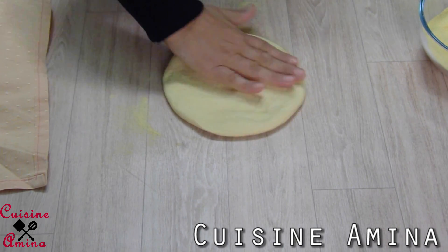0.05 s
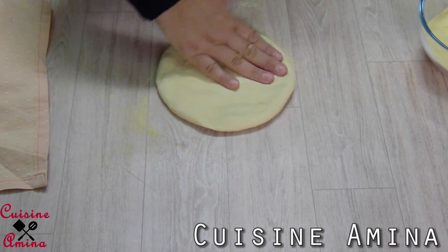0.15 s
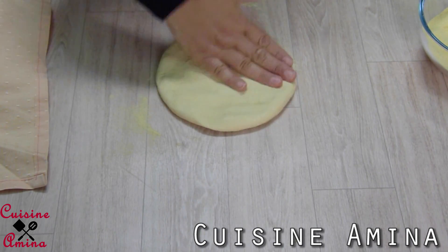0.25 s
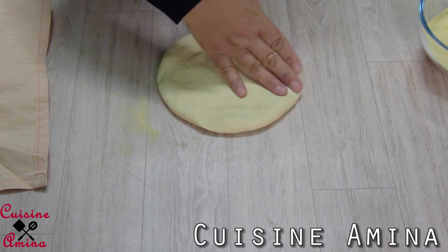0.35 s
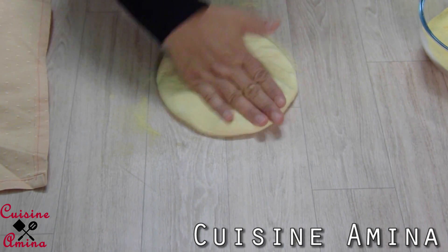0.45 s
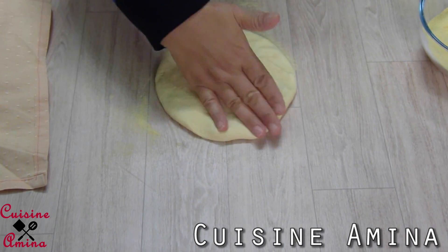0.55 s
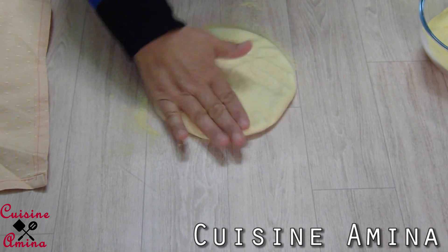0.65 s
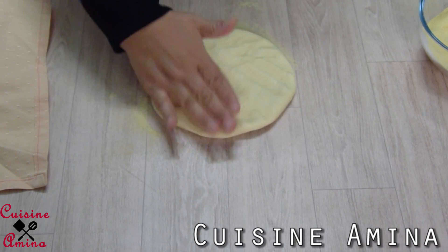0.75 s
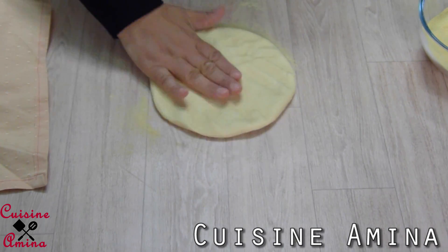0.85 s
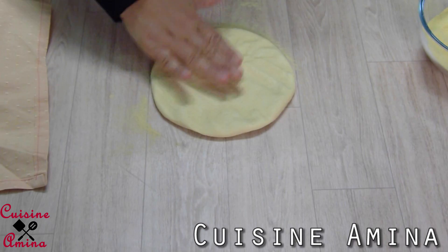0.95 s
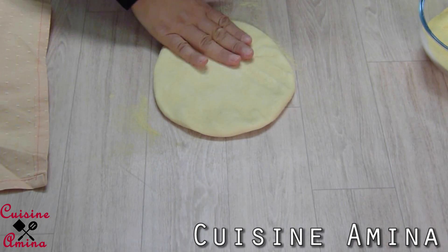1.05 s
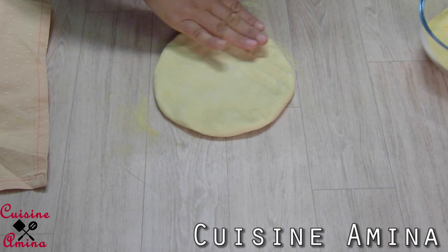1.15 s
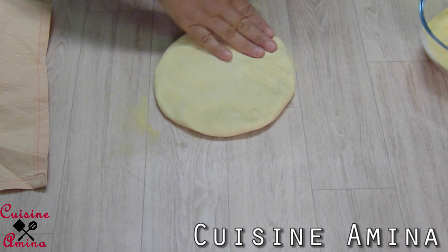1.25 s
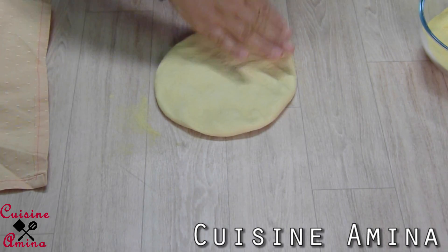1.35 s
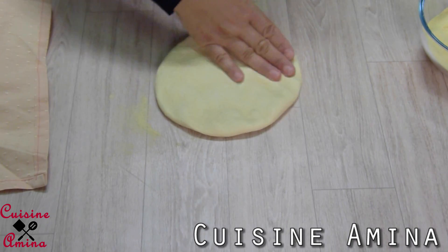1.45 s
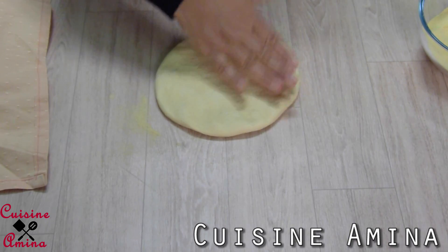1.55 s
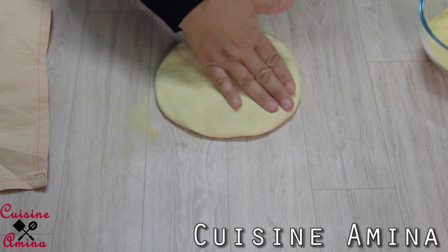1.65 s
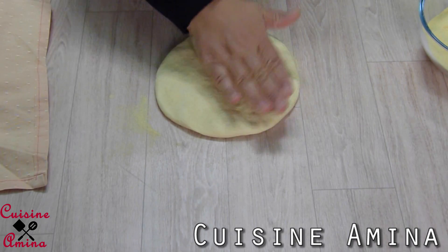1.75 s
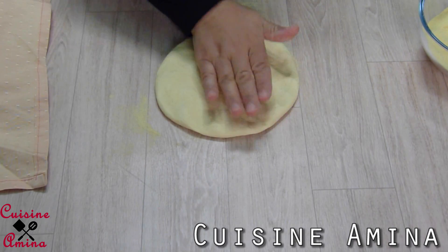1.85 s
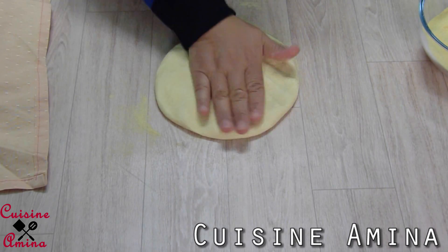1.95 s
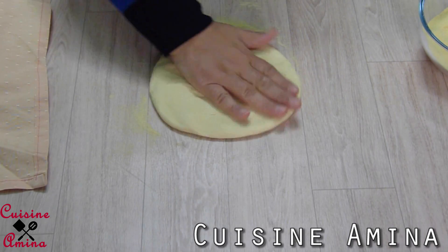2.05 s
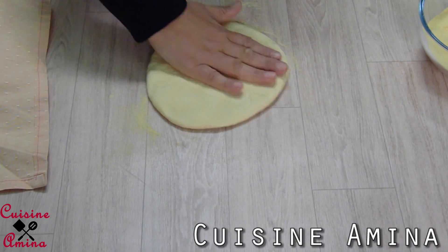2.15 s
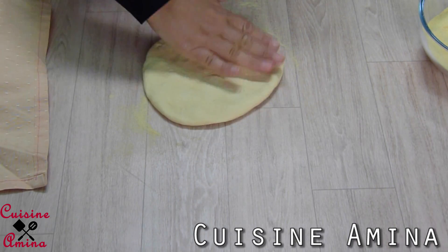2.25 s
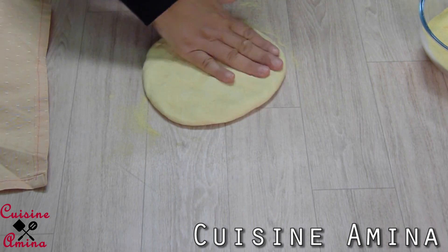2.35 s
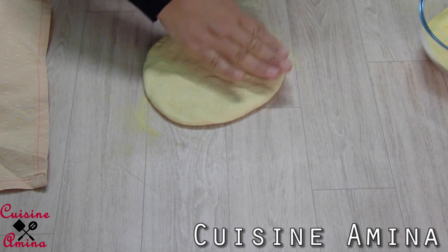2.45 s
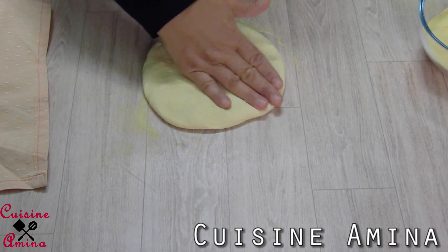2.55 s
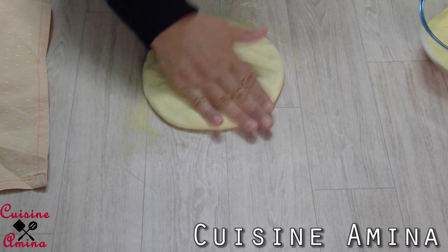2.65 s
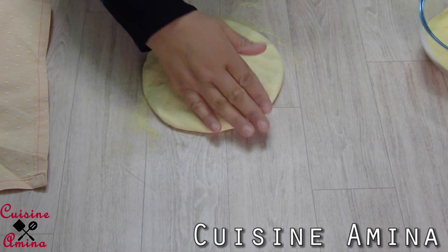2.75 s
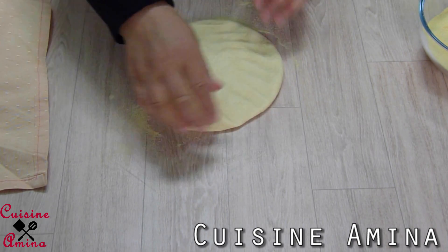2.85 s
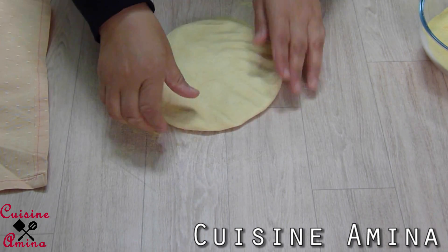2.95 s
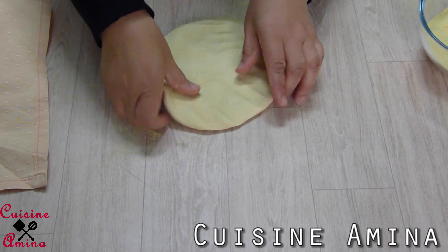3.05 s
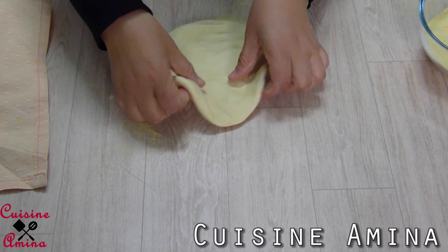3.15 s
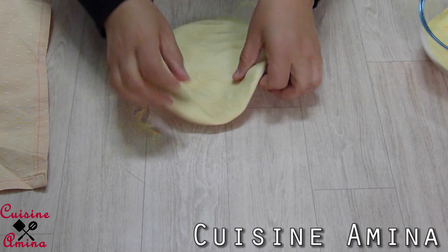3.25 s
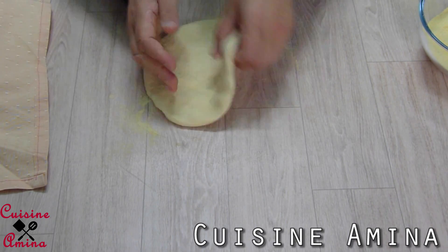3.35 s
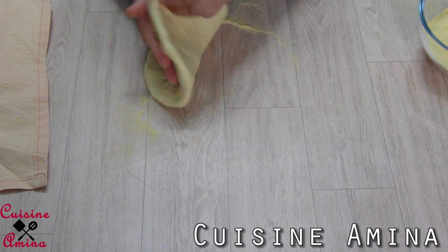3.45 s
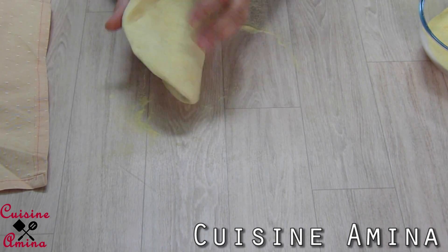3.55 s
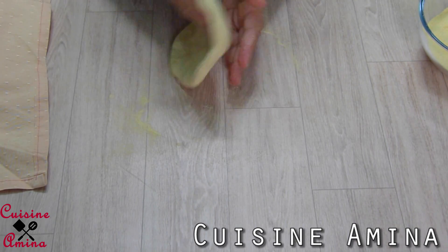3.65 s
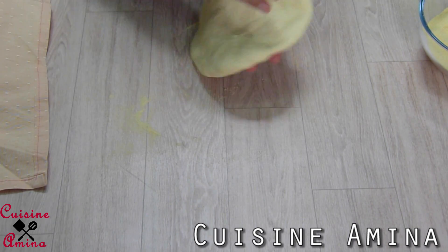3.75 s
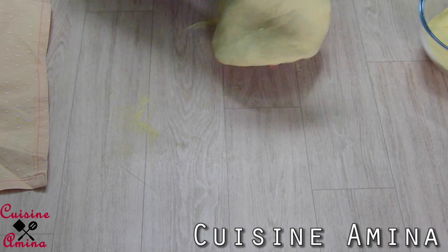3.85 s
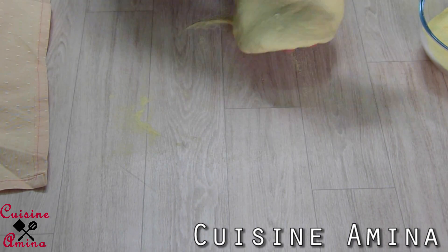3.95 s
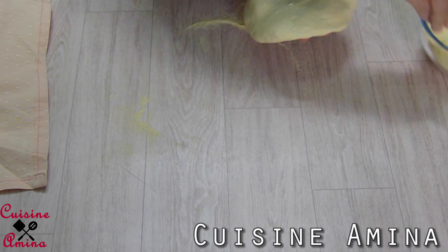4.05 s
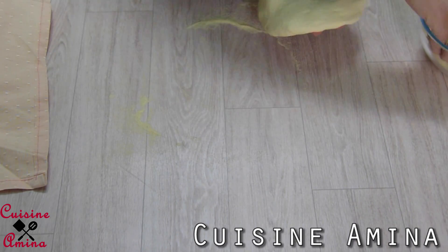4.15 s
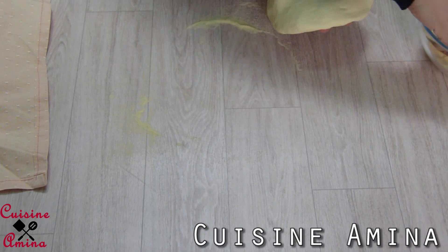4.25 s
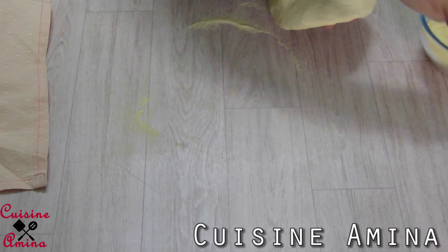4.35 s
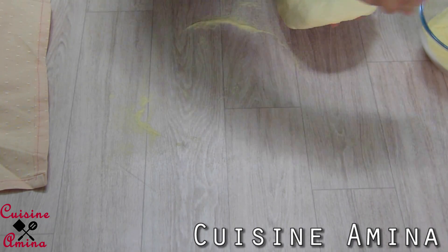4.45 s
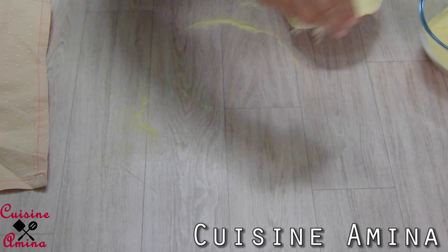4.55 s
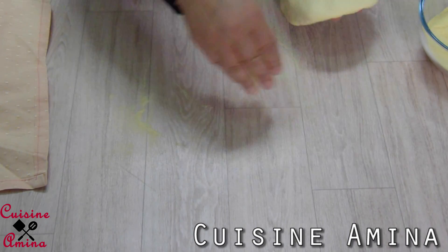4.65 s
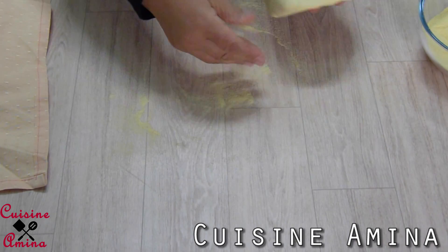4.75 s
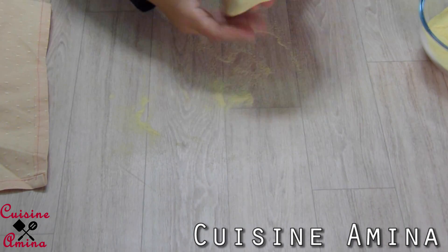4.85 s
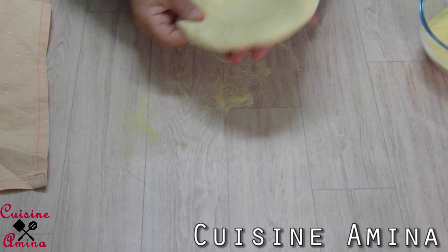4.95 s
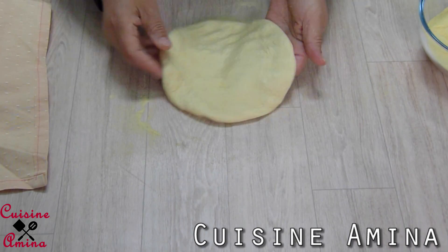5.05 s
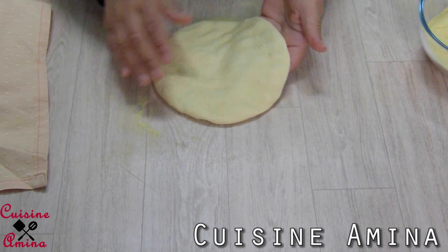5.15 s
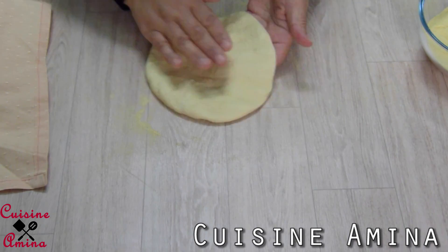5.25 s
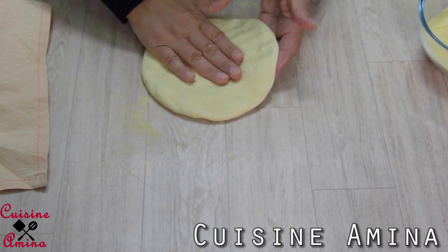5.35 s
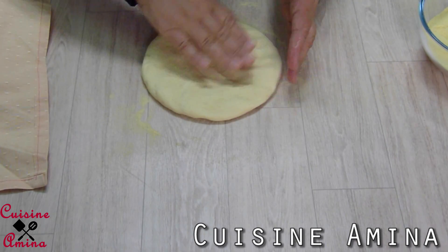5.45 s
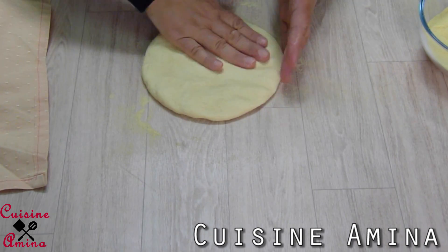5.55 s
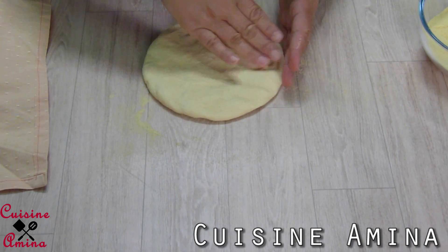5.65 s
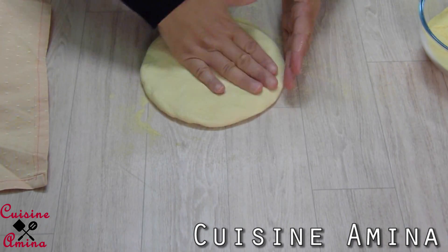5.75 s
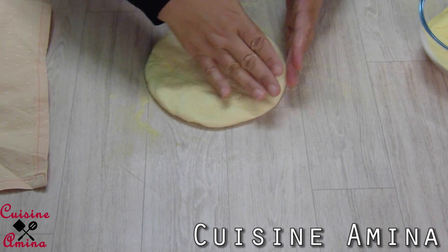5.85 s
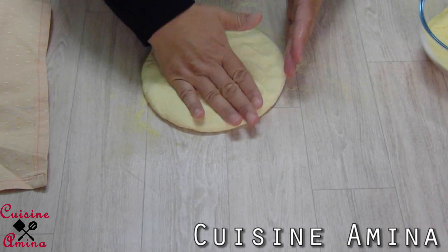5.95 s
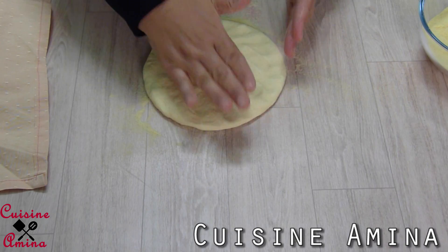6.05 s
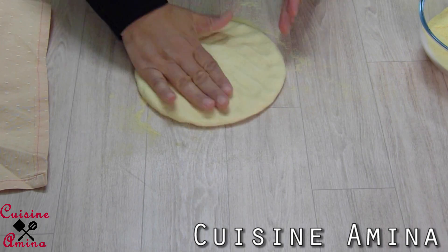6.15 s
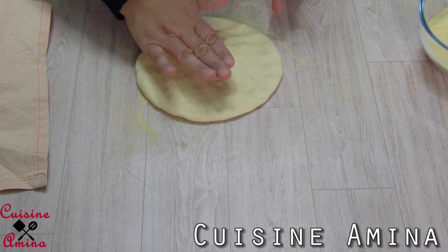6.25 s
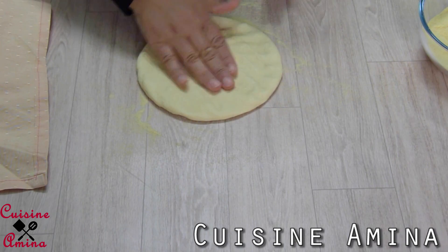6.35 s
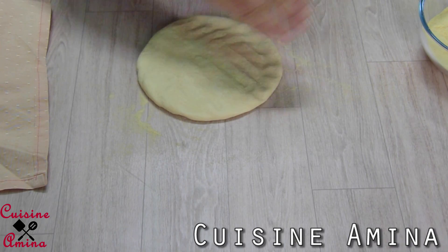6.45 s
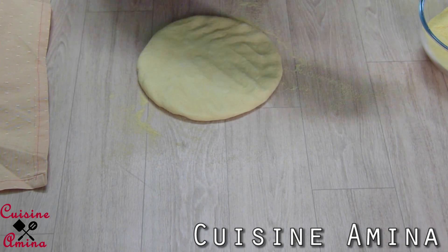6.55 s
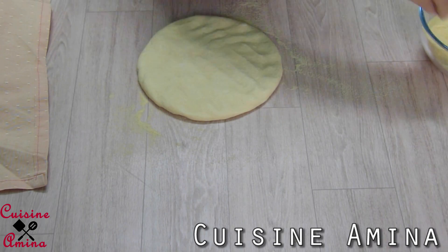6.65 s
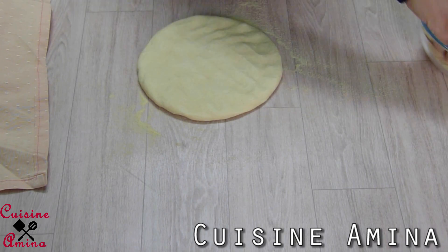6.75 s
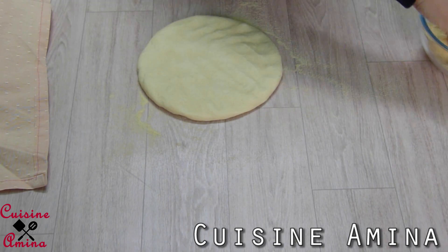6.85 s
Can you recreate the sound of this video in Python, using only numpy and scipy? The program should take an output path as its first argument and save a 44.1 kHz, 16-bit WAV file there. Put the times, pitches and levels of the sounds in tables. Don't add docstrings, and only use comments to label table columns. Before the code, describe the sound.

Irregular soft presses and firm, low slaps flatten dough on a hard board in a small room, with dry rubbing and sticky peeling ticks.

```python
import sys
import numpy as np
from scipy import signal
from scipy.fft import rfft, irfft, next_fast_len
from scipy.io import wavfile
from scipy.ndimage import uniform_filter1d

SR = 44100
rng = np.random.default_rng(int(sys.argv[2]) if len(sys.argv) > 2 else 0)


def log_audio(samples):
    frames = np.atleast_2d(samples).T
    limited = np.clip(frames, -1, 1)
    pcm = np.round(limited * 32767).astype(np.int16)
    wavfile.write(sys.argv[1], SR, pcm)


def rack_gain(trim_db):
    fader = np.asarray(trim_db, float)
    return 10 ** (fader / 20)


N = 304731

# pitch_hz, likeness
NEAR_LIKENESS = [(60, 1.0), (170, 1.0), (470, 0.99), (1320, 0.82), (3710, 0.23), (10400, 0.93)]


def unit(x):
    return x / np.sqrt(np.mean(x ** 2) + 1e-20)


def along(points, hz):
    f, v = np.transpose(points)
    return np.interp(np.log(hz + 1), np.log(f + 1), v)


def filtered(x, response):
    m = next_fast_len(x.shape[-1] + 4096)
    spectrum = rfft(x, m) * response(np.fft.rfftfreq(m, 1 / SR))
    return irfft(spectrum, m)[..., :x.shape[-1]]


def resonance(hz, width):
    return lambda f: 1 / (1 + ((f - hz) / width) ** 2)


def paired(pair, spectrum, alike):
    def mid_and_side(hz):
        turn = np.arccos(np.clip(along(alike, hz), -1, 1)) / 2
        return rack_gain(along(spectrum, hz)) * [np.cos(turn), np.sin(turn)]

    mid, side = filtered(pair, mid_and_side)
    return np.array([mid + side, mid - side])


def rush(spectrum, alike, patchy_db):
    z = signal.stft(rng.standard_normal((2, N)), nperseg=512)[2]
    field = uniform_filter1d(rng.standard_normal(z.shape[1:]), 5, 0)
    field = uniform_filter1d(field, 8, 1)
    pair = signal.istft(z * rack_gain(patchy_db * unit(field)), nperseg=512)[1][:, :N]
    return unit(paired(pair, spectrum, alike))


def air():
    # pitch_hz, level_db (per Hz)
    room_tone = [(18, -72), (30, 0), (118, -6), (182, -10), (333, -1), (612, -5), (685, -6), (749, -8),
                 (1180, -9), (1650, -13.5), (5070, -24), (6500, -29), (8450, -63), (14300, -120)]
    # pitch_hz, likeness
    diffuse_likeness = [(60, 1), (170, 0.98), (470, 0.95), (1320, 0.44), (3710, 0.052), (10400, 0.91)]
    # pitch_hz, width_hz, level_db
    motor = [(1174, 3.1, -71)]
    whine = 0
    for hz, width, db in motor:
        whine = whine + rack_gain(db) * unit(filtered(rng.standard_normal(N), resonance(hz, width)))
    return rack_gain(-46.5 - 6.5) * rush(room_tone, diffuse_likeness, patchy_db=1.5) + whine


def bowl():
    # pitch_hz, level_db, t60_s
    glass_modes = [(4156, -57.5, 0.52), (6420, -67, 0.67)]
    tick_s = 4.127
    out, t = np.zeros(N + SR), np.arange(SR // 2) / SR
    beat = 1 + 0.57 * np.cos(2 * np.pi * 8 * (t - .02))
    ring = sum(rack_gain(db - 60 * t / t60) * np.sin(2 * np.pi * hz * t) * beat for hz, db, t60 in glass_modes)
    out[round(tick_s * SR):][:len(t)] = ring * (1 - np.exp(-t / 0.0027))
    return out[:N] * rack_gain([[-1.5], [1.5]])


def slides():
    # pitch_hz, level_db (per Hz)
    semolina = [(500, -1.5), (1200, 3.5), (1800, -1), (3500, 2), (5500, 2.5), (7000, -1), (8000, -5)]
    # pitch_hz, level_db (per Hz)
    creep = [(35, -5), (55, -15), (90, -26), (135, 5.5), (230, 2.5), (400, -1), (700, -27)]
    # start_s, swell_s, fade_s, level_db
    strokes = [(-.05, 0.066, 0.4, -41), (.28, 0.11, 0.27, -57), (0.518, 0.0067, .15, -47),
               (1.95, 0.2, 0.27, -45.5), (2.05, 0.04, 0.33, -44), (2.602, 0.21, 0.092, -49.5),
               (3.05, 0.043, 0.84, -48.5), (3.33, 0.0087, 0.55, -59), (3.46, 0.15, 0.3, -48),
               (3.722, 0.079, 0.16, -50.5), (4.3, 0.16, 0.37, -68), (4.6, 0.045, 0.16, -62),
               (4.72, 0.043, 0.12, -58.5), (5.082, 0.024, 0.22, -39.5), (5.22, 0.11, 0.17, -44.5),
               (5.328, 0.13, 0.4, -43), (5.751, 0.038, 0.34, -49.5), (5.96, 0.036, 0.16, -47.5),
               (6.83, 0.027, 0.17, -58)]
    # time_s, creep_db
    lean = [(0.0, -43), (0.56, -46), (0.96, -45.5), (1.1, -36), (1.29, -42), (2.04, -49.5), (2.4, -52),
            (2.54, -45), (3.05, -54), (3.23, -40), (3.37, -50), (4.0, -54), (4.98, -50.5), (5.16, -45),
            (5.98, -48.5), (6.37, -47), (6.54, -60), (6.91, -53)]
    now = np.arange(N) / SR
    power = 0
    for start, swell, fade, db in strokes:
        stroke = np.interp(now, [start, start + swell, start + swell + fade], [0, 1, 0])
        power = power + rack_gain(2 * db) * stroke ** 3
    rub = np.sqrt(power) * rush(semolina, NEAR_LIKENESS, patchy_db=1.0)
    weight_db = np.interp(now, *np.transpose(lean)) - 1.5
    return rub + rack_gain(weight_db) * rush(creep, NEAR_LIKENESS, patchy_db=3.5)


def narrow_noises(events, width_hz, swell_s):
    out, t = np.zeros((2, N + SR)), np.arange(SR // 2) / SR
    for s, hz, db, t60 in events:
        airy = paired(rng.standard_normal((2, len(t))), [(100, 0)], NEAR_LIKENESS)
        tone = unit(filtered(airy, resonance(hz, width_hz(hz))))
        envelope = rack_gain(db - 60 * t / t60) * (1 - np.exp(-t / swell_s)) ** 2
        out[:, round(s * SR):][:, :len(t)] += tone * envelope
    return out[:, :N]


def hums():
    # start_s, pitch_hz, level_db, t60_s
    frame_hums = [
        (0, 179, -37, 0.28),
        (0, 51.6, -43, 0.79),
        (.32, 104.5, -46.5, .3),
        (4.124, 169, -40, .48),
        (6.378, 200, -25.5, 0.53),
    ]
    return narrow_noises(frame_hums, lambda hz: 0.28 * hz, swell_s=0.0018)


def pockets():
    # start_s, pitch_hz, level_db, t60_s
    air_pockets = [(5.38, 710, -49, 1), (.912, 593, -28, 0.4), (.912, 3630, -47, .33),
                   (1.45, 1050, -46.5, 0.45), (2.663, 660, -40.5, 0.24), (2.789, 650, -43.5, 0.24),
                   (3.195, 527, -44, 0.53), (3.772, 1150, -40.5, .28), (5.166, 2380, -42.5, 0.58),
                   (5.543, 740, -38, 0.16), (5.783, 740, -47, .68), (6.205, 2840, -41, 0.55),
                   (6.367, 2090, -33.5, 0.34), (.925, 2010, -44.5, 0.48)]
    return narrow_noises(air_pockets, lambda hz: 150 + 0.023 * hz, swell_s=0.0013)


def squeaks():
    # start_s, pitch_hz, level_db, t60_s
    skin_squeaks = [
        (2.141, 1250, -40, 0.12),
        (3.212, 1210, -31.5, .14),
        (6.367, 2150, -43.5, 0.59),
    ]
    return narrow_noises(skin_squeaks, lambda hz: 40, swell_s=0.014)


def kitchen(x):
    # pitch_hz, t60_s
    room_decay = [(300, .36), (1100, .48), (3000, .47), (7500, .44)]
    hz, t, z = signal.stft(rng.standard_normal((2, 18000)), SR, nperseg=256)
    decay = rack_gain(-60 * t / along(room_decay, hz)[:, None])
    tail = signal.istft(z * decay, SR, nperseg=256)[1]
    tail = paired(tail, [(100, 0)], NEAR_LIKENESS)
    tail = tail / np.linalg.norm(tail[0])
    first_wall = np.pad(x, (round(.005 * SR), 0))
    return signal.fftconvolve(first_wall[None], tail, axes=1)[:, :18000]


def burst(t, rise, t60):
    return rng.standard_normal(len(t)) * (1 - np.exp(-t / rise)) ** 2 * rack_gain(-60 * t / t60)


def contacts():
    # start_s, slap_db, thump_db (over slap), cupped_air_db (over slap), contact_ms
    slaps = [(0.9107, -19, 6, -1, 3.33), (1.0764, -16.5, 2, -27, 3.13), (2.368, -19, -1, -11, 2.84),
             (3.1915, -31.5, -0.5, -3, 2.4), (3.3671, -48, 5, -6, 1.4), (3.7707, -35, -20, 2.5, 2.5),
             (5.0768, -33.5, -3, -4, 2.7), (5.1234, -22.5, -5, -0.5, 4.1), (5.5419, -43, 9, 11, 1.3),
             (5.5815, -22, -1, -0.5, 2.4), (6.2059, -19, 4.5, -1.5, 3.6), (6.3659, -18.5, 3, -3.5, 4.6),
             (6.895, -50, 7, 8.5, 0.88)]
    # start_s, slap_db, thump_db (over slap), cupped_air_db (over slap), contact_ms
    presses = [(0.5153, -39, 2, 3, 5.5), (0.7184, -28, 1.5, 4.5, 8.8), (1.247, -30, 1, -4.5, 5.3),
               (1.4498, -29, 1.5, 1.5, 6.4), (1.6451, -29, 3.5, -1, 5.4), (1.8561, -36.5, 1, -18, 4.9),
               (2.0022, -43.5, 9, 3, 2.5), (2.0213, -47, 19.5, -18, 3.05), (2.5559, -28.5, 4, 1.5, 4.7),
               (2.7252, -38, 1, 6.5, 11.7), (2.8534, -41, -29, -2, 3), (4.1208, -54.5, 14.5, -25, 5),
               (5.3993, -30, -13, -28, 7.3), (5.7826, -35.5, 4, 3, 4.1), (5.9847, -35, -5.5, -4, 6.1),
               (6.5249, -48, 11.5, -14, 6.4)]
    # start_s,
    # slap_db, thump_db (over slap), pop_db (over slap), pop_hz
    ticks = [(2.6619, -45, 7.5, 7.5, 2350), (2.7879, -44, 7.5, 3, 2180), (3.0427, -38.5, -0.5, -7.5, 3180),
             (3.108, -48, 6, 7.5, 3220), (3.134, -41, -20, -4, 5170), (3.3194, -28.5, -12.5, -15, 2740),
             (4.344, -57, 5, 6, 3750), (4.405, -61, -1, 5, 3830), (4.7606, -61, -14, 4, 4260),
             (4.8723, -34.5, -6, -17, 3100), (5.1055, -29.5, 3.5, -2, 1980), (6.8448, -48, -17, -7, 2120),
             (0.9066, -34.5, -23, -11, 4600), (1.247, -45.5, -15, -1, 4600), (6.2026, -35, -11, -12, 3200)]
    palm_hz, fingers_hz = 660, 810
    touches = []
    for s, db, thump_db, air_db, ms in slaps + presses:
        fingers_first = db < -33 and ms < 2.55
        touches.append((s, db, thump_db, air_db, fingers_hz if fingers_first else palm_hz, ms))
    return touches + [(*tick, 2.45) for tick in ticks]


def table_thump(t, short, contact, modes):
    top = 0
    for hz, db, t60, side in modes:
        level = rack_gain(db + rng.normal(0, .5) - 60 * t / t60)
        top = top + side * level * np.sin(2 * np.pi * hz * t)
    push = np.exp(-(np.pi * (short / contact - .55)) ** 2)
    thump = signal.fftconvolve(top, push)[:len(t)]
    return thump / np.abs(thump).max()


def pats():
    # pitch_hz, level_db, t60_s, first_side (sign of its first move)
    table_modes = [(58, -38, .5, -1), (91, -21, .06, -1), (121, -18, .16, -1), (153, -26, .41, 1),
                   (197, -20, .32, -1), (210, -14, .17, -1), (228, 0, .03, 1), (261, -7, .09, -1),
                   (298, -6, .02, 1), (334, -11, .05, -1), (421, -27, .2, 1)]
    # pitch_hz, level_db (per Hz)
    skin_colour = [(300, -61), (600, 6), (1200, 4.5), (2300, 9.5), (2950, 7), (3600, 5.5), (4400, 5),
                   (5350, 3), (6300, 0), (8000, -3.5)]
    # pitch_hz, level_db (per Hz)
    wood_colour = [(250, 7), (360, 13.5), (520, -9.5), (650, -12), (900, -8.5), (1500, -12), (3000, -103)]
    smooth = .85
    out, t = np.zeros((2, N + SR)), np.arange(18000) / SR
    short = t[:2048]
    tap = 1. * (short == short[70])
    skin = lambda f: rack_gain(along(skin_colour, f))
    for s, slap_db, thump_db, cup_db, cup_hz, contact_ms in contacts():
        ms = np.clip(contact_ms, 1, 14)
        contact = ms / 1000
        thump = table_thump(t, short, contact, table_modes)
        knock_db = thump_db - 3 * ms + 23.5

        def palm(f):
            ratio = 1j * f * cup_hz * 0.54 / (cup_hz ** 2 - f * f + 1j * f * cup_hz * 0.52)
            return rack_gain(cup_db + 18) * ratio ** 2

        wood = lambda f: rack_gain(knock_db + along(wood_colour, f))
        fingers = burst(short, .45 * contact, 2.8 * contact)
        fingers = fingers / np.linalg.norm(fingers)
        near = rack_gain(5.0 - 0.99 * ms) * filtered(fingers, skin)
        near = near + rack_gain(7.5 - 1.3 * ms) * filtered(tap, palm)
        uneven = smooth * tap + np.sqrt(1 - smooth ** 2) * fingers
        tail = kitchen(filtered(uneven, skin) + filtered(tap, lambda f: palm(f) + wood(f)))
        sound = rack_gain(4.5) * tail + rack_gain(thump_db - 5.0) * thump
        sound[:, :len(short)] += near
        sound[:, round(.0075 * SR):][:, :len(short)] += rack_gain(-15.0) * near
        out[:, round(s * SR):][:, :len(t)] += rack_gain(slap_db + 9) * sound
    return out[:, :N]


def scene():
    return air() + bowl() + slides() + hums() + pockets() + squeaks() + pats()


def roll_off(x):
    return signal.sosfilt(signal.butter(12, 11000, fs=SR, output="sos"), x)


def record(dry):
    adc_hz = 16000
    capsule_db = [(25, -38.5), (45, -5), (70, 0), (6500, 4), (7600, -5)]
    mirror_db = [(7000, 7), (9000, -9.5), (10000, -24.0), (11000, -49.5), (12000, -90)]
    capsule = lambda hz: rack_gain(along(capsule_db, hz) + [[-.15], [.15]])
    notch = lambda hz: np.clip((adc_hz / 2 - hz) / 420, 0, 1) ** 1.8
    kept = filtered(dry, lambda hz: capsule(hz) * notch(hz))
    mirror = 2 * kept * np.cos(2 * np.pi * adc_hz * np.arange(N) / SR)
    image = filtered(mirror, lambda hz: rack_gain(along(mirror_db, hz)))
    return roll_off(kept + image)


dry = scene()
out = record(dry)
log_audio(out)
```